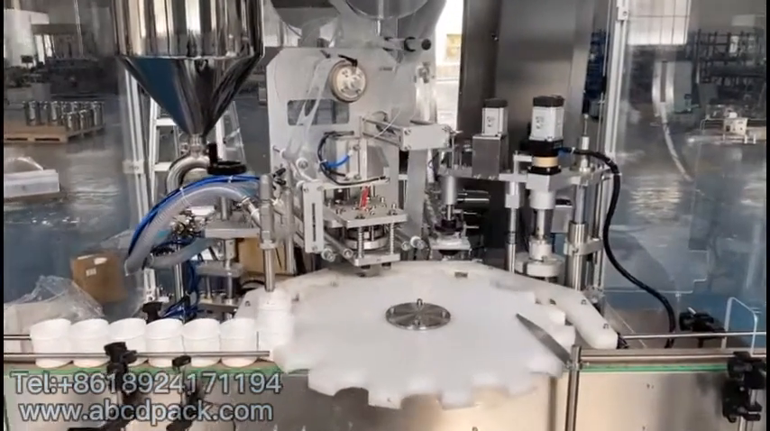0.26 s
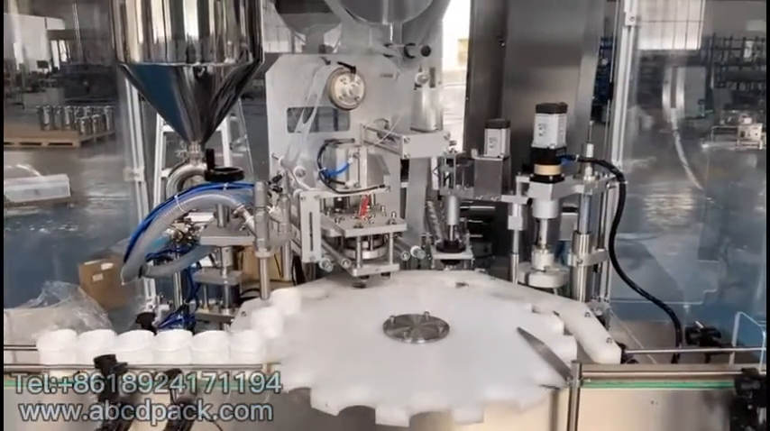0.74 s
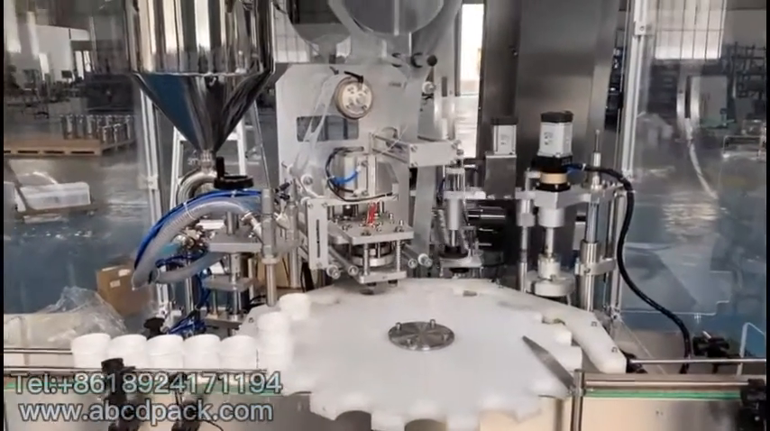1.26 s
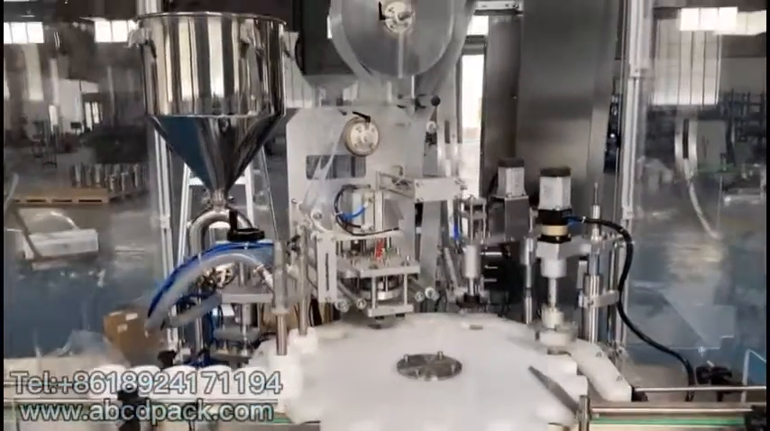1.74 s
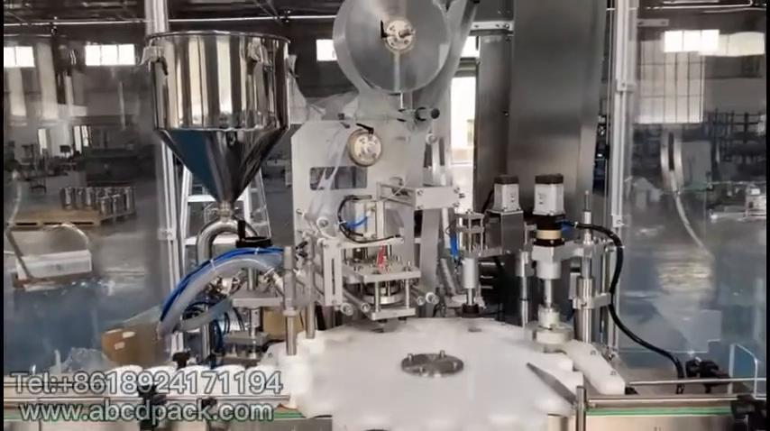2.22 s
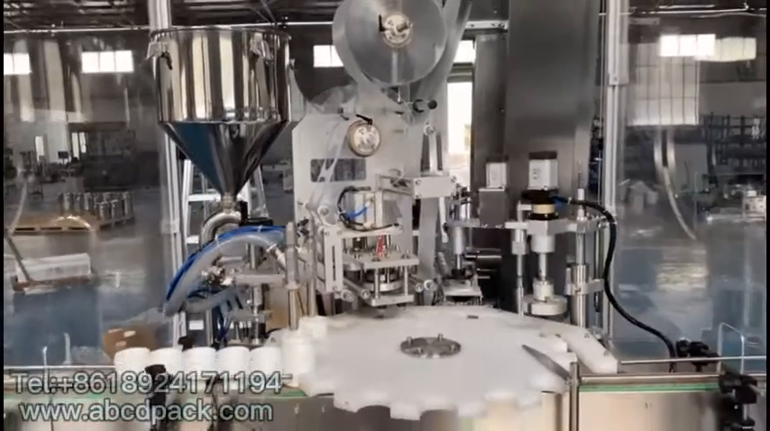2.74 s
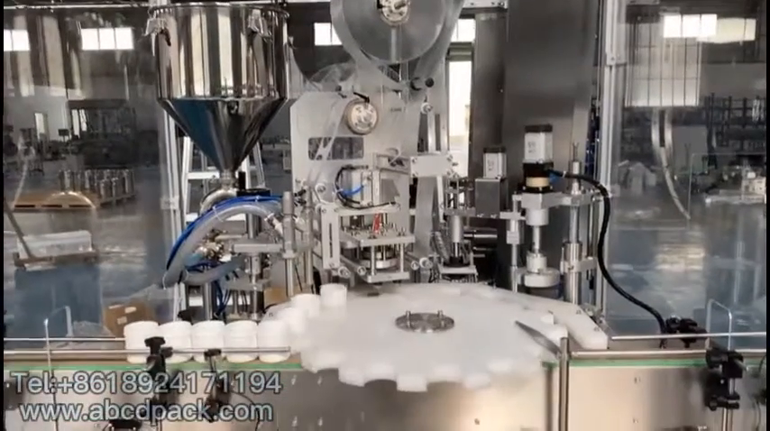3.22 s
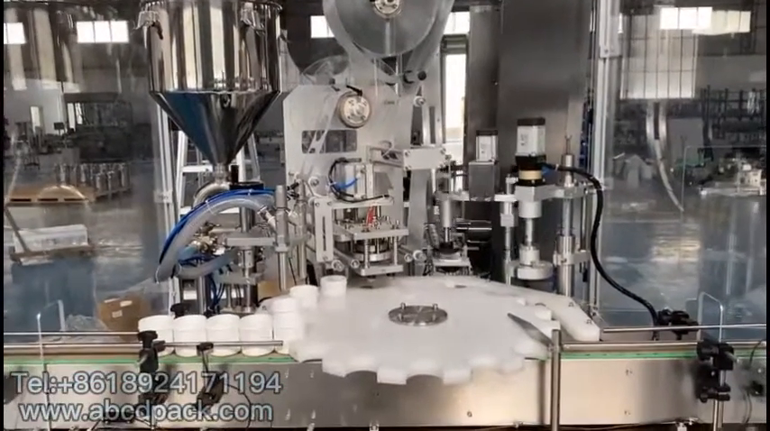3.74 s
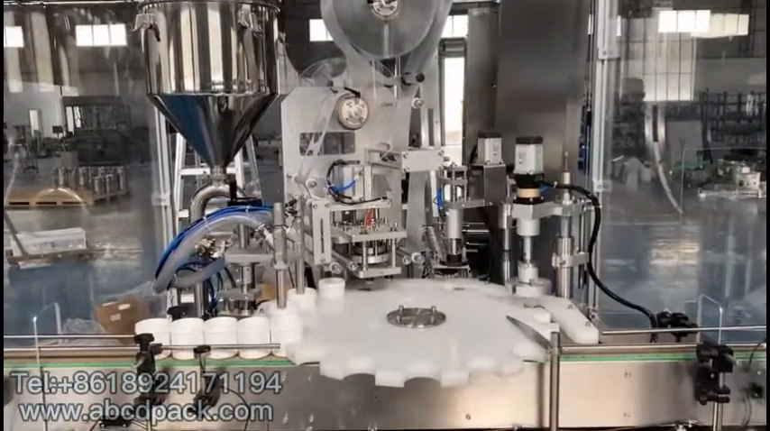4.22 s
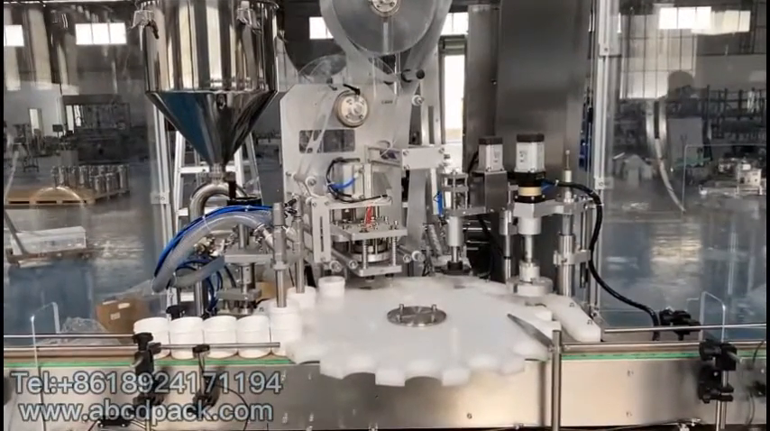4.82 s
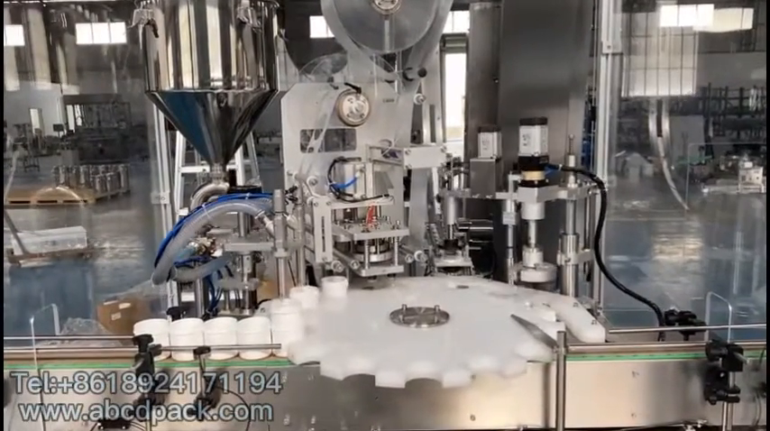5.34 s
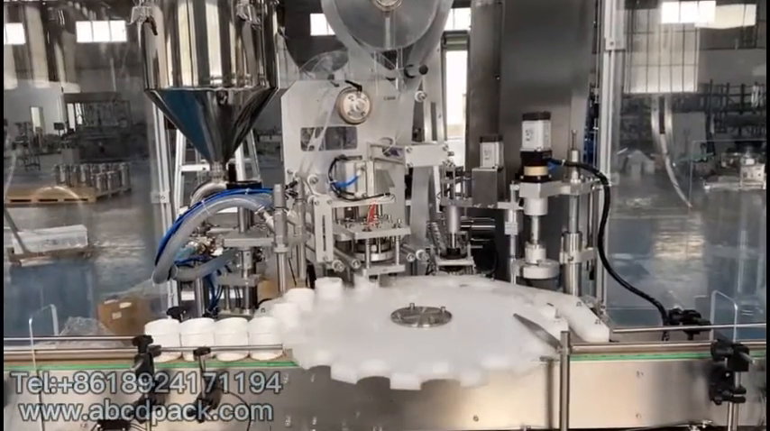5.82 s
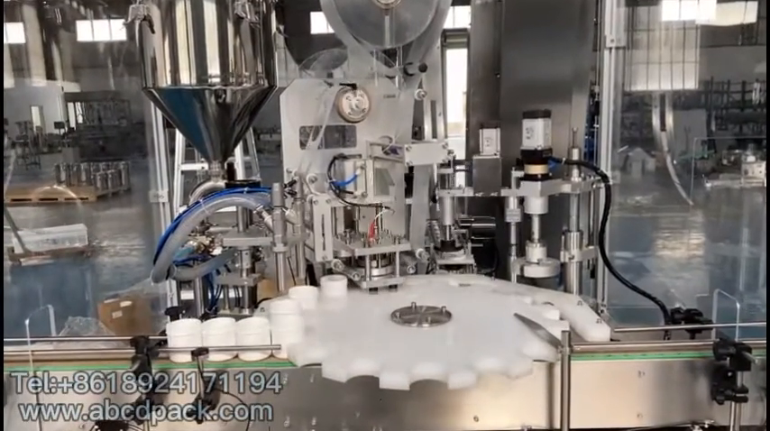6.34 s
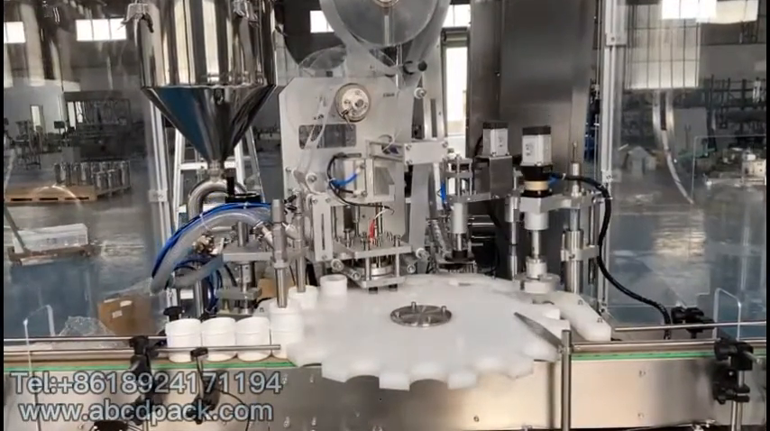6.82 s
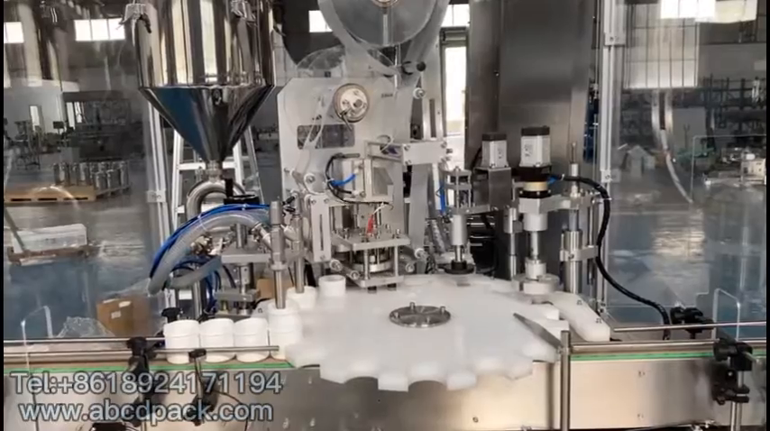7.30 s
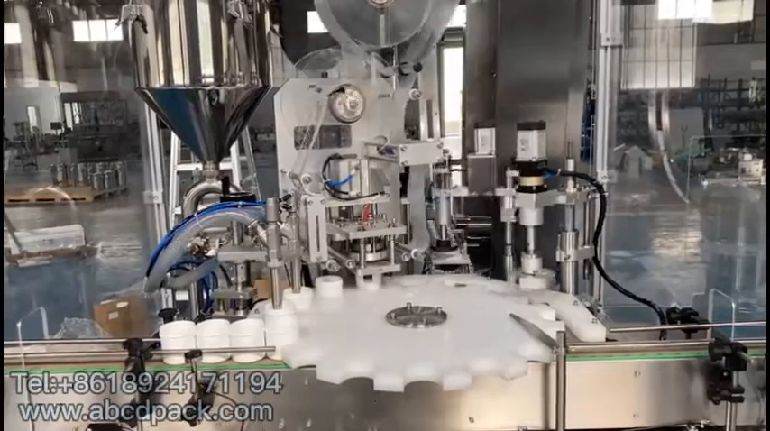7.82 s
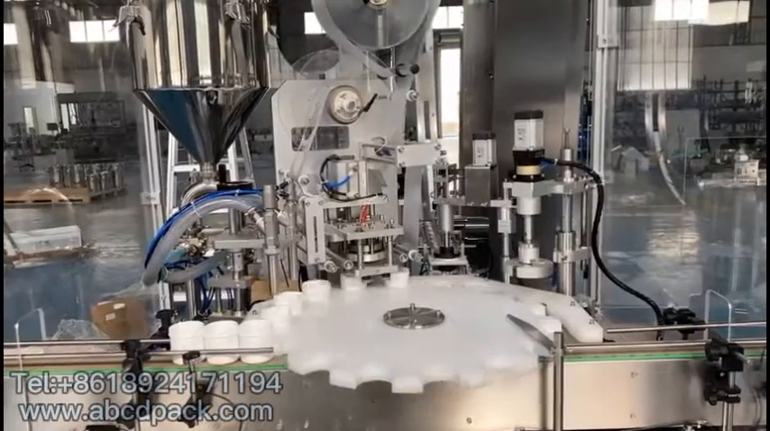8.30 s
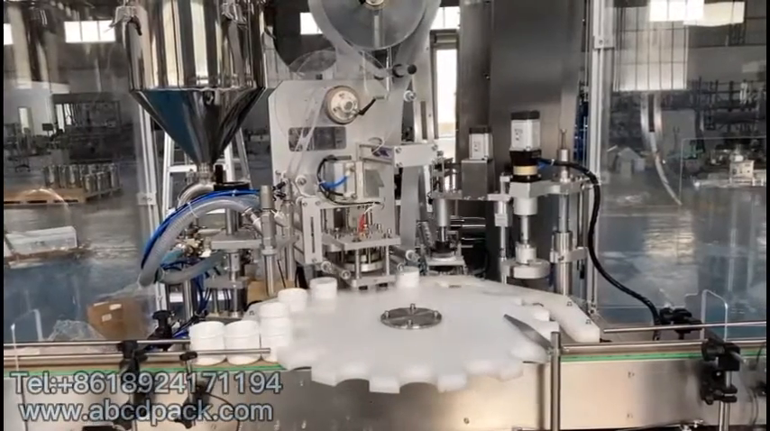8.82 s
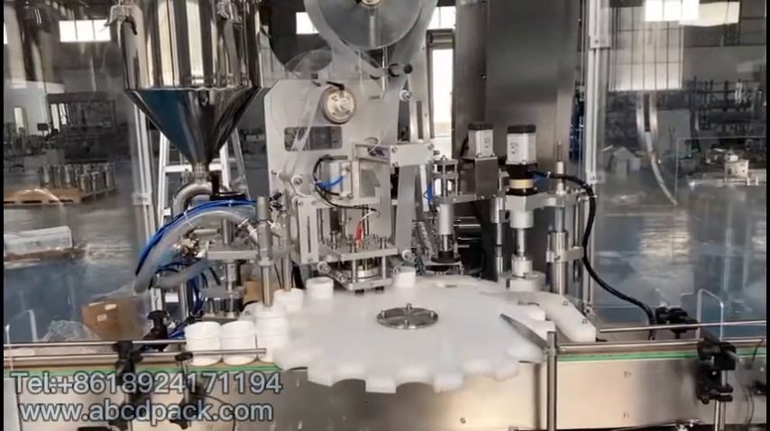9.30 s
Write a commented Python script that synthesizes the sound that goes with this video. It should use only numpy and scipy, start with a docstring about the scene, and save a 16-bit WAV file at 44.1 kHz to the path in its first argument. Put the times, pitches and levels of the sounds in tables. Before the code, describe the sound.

Close by, an automatic filler repeats every two and a half seconds, with hissing pneumatics, ringing metal stops, plastic clatter and humming motors.

```python
"""In a factory hall, a metre or two from a phone, a rotary bottle filler and capper runs four cycles.
Valves puff and vent shaped noise, cylinder stops ring the steel frame as decaying modes, caps clack.
Under it the conveyor judders in grains through its guide modes, the chain ticks in narrow noise bands,
and the drives whirr and hum. Table levels are relative: the functions that play them trim each layer."""
import sys
import numpy as np
from scipy import signal
from scipy.fft import rfft, irfft, next_fast_len
from scipy.io import wavfile

SR = 44100
rng = np.random.default_rng(int(sys.argv[2]) if len(sys.argv) > 2 else 0)


def waveform_to_disk(signal):
    """Save audio, clipped to [-1, 1], as 16-bit WAV at the path in sys.argv[1]."""
    frames = np.transpose(np.atleast_2d(signal))
    scaled = np.clip(frames, -1, 1) * 32767
    samples = np.round(scaled).astype(np.int16)
    wavfile.write(sys.argv[1], SR, samples)


N = 421596
T = np.arange(N) / SR
SIZE = next_fast_len(N + SR)
FREQS = np.maximum(np.arange(SIZE // 2 + 1) * SR / SIZE, 1)
EARS = np.array([[1], [-1]])  # left, right


def undb(db):
    """Decibels to gain."""
    return 10 ** (np.asarray(db) / 20)


def noise():
    """White noise of unit power."""
    return rng.standard_normal(N)


def through(x, response):
    """Filter with a response scaled to keep the power of white noise."""
    return irfft(rfft(x, SIZE) * response / np.sqrt(np.mean(abs(response) ** 2)), SIZE)[..., :N]


def colour(points, size=16384):
    """Causal response through (Hz, dB) points, falling away beyond the ends."""
    hz, db = np.transpose(points)
    f = np.maximum(np.arange(size // 2 + 1) * SR / size, 1)
    octaves_outside = np.maximum(np.log2(f / hz[-1]), 0) + np.maximum(np.log2(hz[0] / f), 0)
    curve_db = np.interp(np.log(f), np.log(hz), db) - 20 * octaves_outside
    # folding the cepstrum gives minimum phase, so nothing sounds early
    cepstrum = irfft(np.log(undb(curve_db)), size)
    impulse = irfft(np.exp(rfft(2 * cepstrum[:size // 2], size)), size)
    return rfft(impulse, SIZE)


def body(modes):
    """Summed response of (Hz, width Hz, dB) resonances."""
    return sum(undb(db) / (1 + 1j * (FREQS ** 2 - hz ** 2) / (FREQS * width)) for hz, width, db in modes)


def burst(start, decay, rise=0.0022, hold=0):
    """Envelope that rises, holds and dies away (all in seconds)."""
    env, first = np.zeros(N), max(int(start * SR), 0)
    t = T[:min(SR, N - first)]
    env[first:first + len(t)] = (1 - np.exp(-t / rise)) * np.exp(-np.maximum(t - hold, 0) / abs(decay))
    return env


def swell(middle, half):
    """Smooth bell-shaped envelope."""
    return np.exp(-np.minimum(((T - middle) / half) ** 2, 20))


def walk(rate):
    """Random wander: straight glides between random levels, rate knots per second."""
    knots = rng.standard_normal(N // 10)
    return np.interp(T * rate, np.arange(len(knots)), knots)


def grains(rate, spread_db):
    """Tiny random impacts of uneven size, about rate per second, unit power."""
    x, chance = np.zeros(N), rng.random(N)
    hits = chance < rate / SR
    sign, size = rng.standard_normal((2, N // 4))[:, :hits.sum()]
    x[hits] = np.sign(sign) * undb(spread_db * size)
    return x / np.std(x)


def ring(start, modes, rise, hold):
    """Modes driven for a moment, then dying away faster the wider they are; every blow differs a little."""
    out, t = np.zeros(N + SR), T[:SR // 3]
    for (hz, width, db), (phase, detune) in zip(modes, rng.random((len(modes), 2))):
        env = (1 - np.exp(-t / rise)) * np.exp(-np.pi * width * np.maximum(t - hold, 0))
        wave = np.sin(2 * np.pi * ((hz + (detune - .5) * width / 2) * t + phase))
        out[max(int(start * SR), 0):][:len(t)] += undb(db) * env * wave
    return out[:N]


def place(x, pan_db, wet):
    """Direct sound plus scatter from nearby steel; the bass reaches both microphones alike."""
    t = T[:SR // 2]
    tails = rng.standard_normal((2, len(t))) * undb(-60 * t / .18) * (t > .002)
    mid, side = rfft(tails / np.sqrt(np.sum(tails ** 2, axis=1, keepdims=True)), SIZE)
    apart = FREQS ** 2 / (FREQS ** 2 + 520 ** 2)
    response = undb(EARS * pan_db * apart / 2) + wet * apart * (0.5 * mid + EARS * side)
    return irfft(rfft(x, SIZE) * response, SIZE)[:, :N]


# a cycle begins: the index valve switches, then its cylinder hits the stop: valve_s, stop_s, stop_db
INDEXINGS = [(0.819, 0.957, -17.5), (3.415, 3.544, -19), (6.007, 6.145, -19), (8.594, 8.728, -21)]
# the bottle gate switches: start_s, puff_db, latch_db
GATES = [(.419, -25.5, -19.5), (3.001, -29, -20.5), (5.607, -30.5, -31), (8.195, -30.5, -28.5)]
# the belt catches on a guide and judders: start_s, hold_s, level_db
CATCHES = [(0.422, 0.017, -19), (0.467, 0.029, -25), (0.52, 0.014, -23.5), (0.549, 0.038, -27),
           (0.825, 0.01, -19), (0.894, 0.02, -22), (1.052, 0.0075, -21.5), (1.224, .012, -25),
           (1.274, .012, -31), (1.823, 0.0067, -26), (2.378, .008, -28), (2.988, 0.0067, -32),
           (3.011, 0.017, -24), (3.073, 0.011, -28), (3.384, .006, -19.5), (3.403, 0.0053, -18.5),
           (3.426, 0.011, -16.5), (3.48, 0.029, -19), (4.378, 0.019, -22.5), (4.55, 0.0055, -24),
           (4.603, .009, -21), (5.612, 0.0096, -17.5), (5.673, 0.024, -23.5), (6.012, 0.012, -18),
           (6.061, 0.014, -24), (6.601, 0.015, -23.5), (6.82, 0.0074, -23.5), (6.927, 0.0097, -29),
           (8.221, 0.014, -26), (8.57, 0.018, -18.5), (8.605, 0.009, -22), (8.697, .014, -32)]
# guide modes under the drag: pitch_hz, width_hz, level_db
GUIDE_MODES = [(751, 51, 8), (810, 110, 10.5), (930.6, 65, 14.5), (897, 17, -4)]
# guide modes that a catch rings: pitch_hz, width_hz, level_db
CATCH_MODES = [(945, 46, -5), (879, 69, -6.5), (771, 56, -7)]
# the belt slackens before each indexing and gate
SLACK_LEAD_S, REST_SLACK_DB, GATE_SLACK_DB, DRAG_DB = 0.12, 7.5, 5.5, -33.5
# it sticks and slips at an uneven rate; each slip fades within a share of its cycle
SLIP_HZ, SLIP_FADE, SLIP_DEPTH = 18, .5, .22


def conveyor():
    """The belt drags in tiny slips that ring its guides; it slackens and takes up again with a judder."""
    slack = sum(REST_SLACK_DB * swell(s - SLACK_LEAD_S, half=0.11) for s, _, _ in INDEXINGS)
    slack = slack + sum(GATE_SLACK_DB * swell(s - .04, half=0.04) for s, _, _ in GATES)
    cycle = np.cumsum(SLIP_HZ * np.exp(.25 * walk(20))) / SR % 1
    judder = 1 - SLIP_DEPTH + SLIP_DEPTH * np.exp(-cycle / SLIP_FADE) / SLIP_FADE
    drag = undb(DRAG_DB - slack + 1.6 * walk(30)) * judder
    slips = sum(undb(db - 11) * burst(s, decay=0.0089, hold=hold) for s, hold, db in CATCHES)
    restarts = [s for s, _, _ in INDEXINGS + GATES]
    strain = undb(-44.5) * sum(burst(s, decay=0.29, rise=0.013) for s in restarts)
    friction = drag + slips + strain
    guide = body(GUIDE_MODES) * body([(830, 194, 0)])
    # the long guides radiate from many places, so the two microphones hear partly different slips
    mid, side = (through(friction * grains(rate=1200, spread_db=2), guide) for _ in range(2))
    catches = sum(undb(db - 0.1) * ring(s, CATCH_MODES, rise=0.00088, hold=hold) for s, hold, db in CATCHES)
    return (mid + catches) * undb(EARS * 2.95) + undb(-3) * EARS * side


# bottle modes: pitch_hz, width_hz, level_db
BOTTLE_MODES = [(1760, 79, 3.5), (2300, 180, -4.5), (2880, 290, -4.5), (4720, 260, -1.5)]
JOSTLE_DB = -56
REST_LEAD_S, REST_HALF_S = 0.13, 0.057  # the drives rest just before each indexing


def bottles():
    """Plastic bottles rub and tap in uneven grains through their modes, fainter while the drives rest."""
    resting = sum(swell(s - REST_LEAD_S, half=0.045) for s, _, _ in INDEXINGS)
    taps = grains(rate=260, spread_db=3) * undb(3.5 * walk(22) - 12 * resting)
    jostle = through(taps, body(BOTTLE_MODES) * body([(2600, 3500, 0)]))
    return place(undb(JOSTLE_DB) * jostle, pan_db=11.0, wet=0.74)


# hall rumble spectrum: pitch_hz, density_db_per_hz
HALL_SPECTRUM = [(20, -47), (40, -9), (62, 4), (100, -10), (142, -6.5), (190, -9.5), (330, -6.5),
                 (500, -8.5), (800, -12.5), (1300, -19), (3000, -23), (5000, -34), (11000, -37)]
# drive whirr spectrum: pitch_hz, density_db_per_hz
WHIRR_SPECTRUM = [(100, 5.5), (400, 12), (1000, -9), (1400, 2), (2000, 5), (2500, 3), (3300, 6.5),
                  (4700, 4.5), (5400, 0), (6500, 1.5), (8000, -10.5), (11000, -36)]


def drives():
    """Noise rumbles in the hall and dense grains whirr; the drives rest once a cycle, restarting with a squeak."""
    rests = [s - REST_LEAD_S for s, _, _ in INDEXINGS]
    resting = sum(swell(s, REST_HALF_S) for s in rests)
    hall = through(noise(), colour(HALL_SPECTRUM)) * undb(-36.0 + 1.8 * walk(11) - 2 * resting)
    whirr = through(grains(rate=5000, spread_db=4.0), colour(WHIRR_SPECTRUM))
    whirr = whirr * undb(-47.0 + 2.0 * walk(13) - 7.5 * resting)
    squeak = sum(burst(s + 0.072, decay=0.018, hold=0.027) for s in rests) * undb(-39 + 2.2 * walk(150))
    squeak = through(squeak * noise(), body([(3380, 280, 0)]) * body([(3280, 1200, 0)]))
    return place(hall + whirr + squeak, pan_db=2.0, wet=0.74)


# wavering motor lines: pitch_hz, level_db
HUM_LINES = [(141, -48.5), (323, -54), (544, -51.5), (630, -48.5)]


def motors():
    """The motors hum in sine lines that each waver, swell and fade by themselves."""
    hum = 0
    for hz, db in HUM_LINES:
        line = np.sin(2 * np.pi * hz * T + 0.96 * walk(7))
        hum = hum + undb(db) * line * (1 + 0.39 * walk(9))
    return place(hum, pan_db=-6.0, wet=0.2)


# the big press cylinder dumps its air, then lands: dump_s, landing_s, blow_db
PRESSINGS = [(-.14, 0.005, -13.5), (2.456, 2.602, -15.5), (5.06, 5.194, -15), (7.563, 7.766, -15.5)]
# the capper slides down and lands: landing_s, blow_db, valve_db
CAPPINGS = [(1.416, -26.5, -21.5), (4.019, -25.5, -20.5), (6.52, -30, -23.5), (9.121, -26.5, -21.5)]
# the cap feeder's slide reaches an end stop: stop_s, blow_db
FEEDS = [(7.451, -25.5), (7.521, -20.5)]
# steel frame modes: pitch_hz, width_hz, level_db
FRAME_MODES = [(143.7, 9.7, -1), (173.2, 9.3, 2), (218.7, 13.6, -1.5), (299.3, 24, -0.5), (404, 62, -2),
               (476.6, 15, 3), (648, 10.7, -1), (700, 18, 2), (832, 62, -6), (888, 58, 0), (1070, 96, 0),
               (1213, 32, -3), (1400, 150, -11), (1528, 69, -15), (1662, 53, -10), (2100, 82, -22)]
# knock spectrum: pitch_hz, density_db_per_hz
KNOCK_SPECTRUM = [(60, 0.5), (200, 5.5), (900, 7), (1500, -4), (3000, -11), (7000, -22.5), (11000, -30)]
# low modes swing up later; press and capper landings push in faster than index and feeder stops
STOP_RISE_S, LANDING_RISE_S, STOP_HOLD_S, BASS_LAG_S = 0.0026, 0.0014, 0.018, 0.0052
PRESS_BASS_DB = -0.14  # per octave below 700 Hz
REBOUND_S, REBOUND_DB = .062, -16.5
CHATTER_DB, CHATTER_S = -23, 0.071  # loose joints chatter on after a stop


def cylinders():
    """Stops ring the frame, low modes latest, under a rattle of contacts; each slide rebounds once, softly."""
    stops = [(s, db, STOP_RISE_S, 0) for _, s, db in INDEXINGS] + [(s, db, STOP_RISE_S, 0) for s, db in FEEDS]
    stops += [(s, db, LANDING_RISE_S, PRESS_BASS_DB) for _, s, db in PRESSINGS]
    stops += [(s, db, LANDING_RISE_S, 0) for s, db, _ in CAPPINGS]
    frame = 0
    for s, db, rise, bass_db in stops:
        for (hz, width, mode_db), luck_db in zip(FRAME_MODES, rng.standard_normal(len(FRAME_MODES))):
            lag = BASS_LAG_S * FRAME_MODES[0][0] / hz
            level = undb(db - 10 + luck_db + bass_db * np.log2(700 / hz))
            frame = frame + level * ring(s + lag, [(hz, width, mode_db)], rise=rise + lag, hold=STOP_HOLD_S)
        rebound = ring(s + REBOUND_S, FRAME_MODES, rise=0.0078, hold=0.0038)
        frame = frame + undb(db - 4.0 + REBOUND_DB) * rebound
    blows = sum(undb(db) * burst(s, decay=0.021, rise=rise / 2, hold=0.023) for s, db, rise, _ in stops)
    knock = undb(-5) * through(blows * grains(rate=3300, spread_db=1.0), colour(KNOCK_SPECTRUM))
    shaken = sum(undb(db + CHATTER_DB) * burst(s + 0.028, decay=CHATTER_S, rise=0.014, hold=0.02)
                 for s, db, _, _ in stops)
    joints = through(shaken * grains(rate=130, spread_db=3), body(FRAME_MODES))
    return place(frame + knock + joints, pan_db=2.5, wet=0.47)


# chain links in turn: snap_db, roller_db
LINKS = [(-31, -35), (-30, -36), (-31.5, -35), (-30, -40), (-31, -42), (-31, -39), (-29.5, -46), (-30, -40),
         (-30, -37), (-26.5, -36.5), (-27.5, -31), (-28, -34), (-38, -44), (-25, -47), (-31, -44),
         (-28.5, -42), (-29, -42), (-25, -36), (-29, -38), (-27, -41), (-35, -38), (-32, -43), (-29, -42),
         (-27, -37), (-28, -40), (-31, -33), (-29, -37), (-26.5, -48), (-44, -40), (-28, -43), (-33, -36),
         (-34, -37), (-24, -40), (-26.5, -34), (-37, -32), (-30.5, -39), (-35, -30), (-26.5, -42),
         (-31, -40), (-30.5, -38)]
FIRST_LINK_S, LINK_PERIOD_S, LINK_RISE_S = .109, .2359, .003
LINK_HZ, ROLLER_HZ, LINK_SCATTER_HZ = 3810, 2510, 28


def chain():
    """Links snap evenly onto the sprocket, each roller settling lower, no two quite at one pitch."""
    def band(x, lo, hi, order):
        return signal.sosfilt(signal.butter(order, [lo, hi], "band", fs=SR, output="sos"), x)

    out, t = np.zeros(N + SR), T[:SR // 10]
    snap = (1 - np.exp(-(t / LINK_RISE_S) ** 2)) * (np.exp(-t / 0.0052) + 0.32 * np.exp(-t / 0.016))
    settle = (1 - np.exp(-(t / 0.0069) ** 2)) * np.exp(-t / 0.017)
    for k, (snap_db, roller_db) in enumerate(LINKS):
        hz, low = np.array([LINK_HZ, ROLLER_HZ]) + LINK_SCATTER_HZ * rng.standard_normal(2)
        hiss, rattle = rng.standard_normal((2, len(t)))
        link = band(band(snap * hiss, hz - 150, hz + 150, order=1), 2800, 4600, order=2)
        roller = band(settle * rattle, low - 110, low + 110, order=1)
        tick = undb(snap_db + 17.5) * link + undb(roller_db + 23.0) * roller
        out[int((FIRST_LINK_S + k * LINK_PERIOD_S) * SR):][:len(t)] += tick
    return place(out[:N], pan_db=5.0, wet=0.14)


def jet(envelope, treble_db, spectrum, flutter_db):
    """Turbulent air as fluttering coloured noise; treble_db lifts or cuts its top."""
    air = through(noise(), colour(spectrum)) * undb(flutter_db * walk(170))
    top = irfft(rfft(air, SIZE) / (1 + (7500 / FREQS) ** 6), SIZE)[:N]
    return envelope * (air + (undb(treble_db) - 1) * top)


# valve puff spectrum: pitch_hz, density_db_per_hz
PUFF_SPECTRUM = [(200, 15), (1000, 3.5), (2000, 6), (3400, 6.5), (5000, 2), (6800, -1.5), (8000, -6.5),
                 (11000, -5)]
INDEX_PUFF_DB, SHUT_PUFF_DB = -21.5, -25
DUMP_S = 0.11  # how long the press dumps its air


def valves():
    """Index and gate valves puff brightly, then faintly again; the capper puffs once, the press more dully."""
    switches = [(s, INDEX_PUFF_DB) for s, _, _ in INDEXINGS] + [(s, db) for s, db, _ in GATES]
    bright = sum(undb(db - 3.0) * (burst(s, decay=0.035) + undb(-11.5) * burst(s + 0.063, decay=0.025))
                 for s, db in switches)
    capper = sum(undb(db - 1.0) * burst(s, decay=0.015) for s, _, db in CAPPINGS)
    shut = sum(burst(s + DUMP_S, decay=0.016) + undb(-16) * burst(landing, decay=0.025)
               for s, landing, _ in PRESSINGS if s > 0)
    puffs = jet(bright, 4.1, PUFF_SPECTRUM, flutter_db=1.5) + jet(capper, 2.2, PUFF_SPECTRUM, flutter_db=2.0)
    puffs = puffs + jet(undb(SHUT_PUFF_DB) * shut, -5, PUFF_SPECTRUM, flutter_db=5.0)
    return place(puffs, pan_db=4.0, wet=0.69)


# air turns the star wheel one pocket on: start_s, rumble_db
TURNS = [(5.981, -21.5), (8.562, -21.5)]


def travels():
    """(envelope, dB) of each travel: the wheel turns, the capper and feeder slide, the press draws back."""
    wheel = [(swell(s + 0.323, half=0.061), db) for s, db in TURNS]
    capper = [(swell(s + 0.018, half=0.18), -30.5) for s, _, _ in CAPPINGS]
    feeder = [(swell(s, half=0.045), -34) for s, _ in FEEDS]
    press = [(swell(s + 0.2, half=0.09), -29) for dump, s, _ in PRESSINGS if dump > 0]
    return wheel + capper + feeder + press


# hard caps clack in the gripper: start_s, level_db, loudest_hz
CLACKS = [(0.957, -37, 2000), (1.027, -25, 1280), (1.418, -27, 1900), (3.613, -25.5, 1200),
          (4.019, -29, 1500), (5.2, -17.5, 1400), (6.2216, -23, 1150), (6.305, -26, 1350),
          (6.538, -26.5, 1700), (7.152, -13.5, 1140), (7.19, -15, 2300), (7.246, -9.5, 1600),
          (7.773, -16, 1400), (8.805, -23, 1150), (8.882, -19.5, 1400)]
# cap and gripper modes: pitch_hz, width_hz, level_db
CAP_MODES = [(995, 86, -1.5), (1274, 97, -9), (1403, 70, -3.5), (1700, 140, -19), (2048, 130, -4),
             (2495, 85, -12), (2920, 81, -11)]
# clack spectrum: pitch_hz, density_db_per_hz
CLACK_SPECTRUM = [(400, -13), (1000, -0.5), (1370, 8), (1700, -25), (2100, -6), (3000, -20), (8000, -16)]
# gate latch modes: pitch_hz, width_hz, level_db
LATCH_MODES = [(2500, 63, -4), (3190, 59, -2), (3480, 43, 1.5), (3900, 40, -15)]
CAP_RISE_S, CAP_HOLD_S = .0004, .008
CAP_FOCUS_DB = 14  # drop per octave away from the loudest pitch
INDEX_LATCH_DB, CAPPER_LATCH_DB, GATE_RING_DB, CAPPER_RATTLE_DB = -22, -22.5, -10.5, -36


def fittings():
    """Caps clack in the gripper, latches snap as valves switch, loose parts rattle while the slides travel."""
    def struck(centre):
        return [(hz, width, db - CAP_FOCUS_DB * abs(np.log2(hz / centre))) for hz, width, db in CAP_MODES]

    caps = sum(undb(db - 4.0) * ring(s, struck(centre), rise=CAP_RISE_S, hold=CAP_HOLD_S)
               for s, db, centre in CLACKS)
    cracks = sum(undb(db - 11.5) * burst(s, decay=0.0096, rise=0.0011, hold=0.0095) for s, db, _ in CLACKS)
    cracks = through(cracks * grains(rate=5000, spread_db=1.5), colour(CLACK_SPECTRUM))
    snaps = [(s, INDEX_LATCH_DB) for s, _, _ in INDEXINGS] + [(s, CAPPER_LATCH_DB) for s, _, _ in CAPPINGS]
    snaps += [(s, db) for s, _, db in GATES]
    latches = sum(undb(db - 10.0) * burst(s, decay=0.011, rise=0.0014, hold=0.0093) for s, db in snaps)
    latches = through(latches * grains(rate=4000, spread_db=10.0), body([(3120, 1450, 0)]) ** 2)
    spring = sum(undb(db + GATE_RING_DB) * ring(s, LATCH_MODES, rise=.0015, hold=0.012) for s, _, db in GATES)
    jolts = undb(CAPPER_RATTLE_DB) * sum(burst(s, decay=0.021) for s, _, _ in CAPPINGS)
    loose = (undb(-46.5) * sum(env for env, _ in travels()) + jolts) * grains(rate=600, spread_db=3)
    loose_body = body([(1750, 59, 15.0), (2340, 610, 5.5), (3220, 490, -12)]) * body([(2400, 1900, 0)])
    return place(caps + cracks + latches + spring + through(loose, loose_body), pan_db=2.5, wet=0.86)


# slides vent through silencers: start_s, hold_s, level_db, lurch_db
VENTS = [(1.14, 0.063, -30, -34.5), (3.726, 0.082, -30.5, -31), (6.733, 0.027, -29, -39),
         (7.042, 0.084, -26.5, -36), (7.14, 0.27, -30.5, -33), (7.431, 0.03, -28, -44),
         (9.314, 0.038, -32, -45)]
# the cabinet also swings between strokes: start_s, hold_s, level_db
SWAYS = [(0.721, 0.074, -34.5), (2.75, .025, -38), (5.253, 0.027, -31), (8.937, 0.028, -27.5),
         (9.033, .05, -38)]
# cabinet panel modes: pitch_hz, width_hz, level_db
CABINET_MODES = [(62.2, 11.6, -0.5), (143.5, 7.2, -10.5), (219.5, 21, -13.5)]
# rolling slide spectrum: pitch_hz, density_db_per_hz
ROLL_SPECTRUM = [(30, -20), (68, 12), (105, -3), (145, 2), (200, 1), (330, 3), (500, -19), (900, 0),
                 (1400, -19), (3000, -22), (8000, -31)]
# moving masses rock the cabinet, some time after the stroke starts
INDEX_LURCH_DB, PRESS_LURCH_DB, PRESS_LURCH_S = -34.5, -24.5, 0.0212
TURN_LURCH_DB, TURN_LURCH_S = -27.5, .275


def cabinet():
    """Sudden strokes set the panels swinging; travelling slides make them rumble."""
    lurches = [(s, INDEX_LURCH_DB, .03) for s, _, _ in INDEXINGS]
    lurches += [(s + PRESS_LURCH_S, PRESS_LURCH_DB, .026) for s, _, _ in PRESSINGS if s > 0]
    lurches += [(s + TURN_LURCH_S, TURN_LURCH_DB, .058) for s, _ in TURNS]
    lurches += [(s + 0.0147, db, .024) for s, _, _, db in VENTS]
    lurches += [(s, db, hold) for s, hold, db in SWAYS]
    swing = sum(undb(db + 7.5) * ring(s, CABINET_MODES, rise=0.0024, hold=hold) for s, db, hold in lurches)
    travel = sum(undb(db - 5.0) * env for env, db in travels())
    return swing + place(through(travel * noise(), colour(ROLL_SPECTRUM)), pan_db=-2, wet=1.0)


# first-contact crack spectrum: pitch_hz, density_db_per_hz
CRACK_SPECTRUM = [(500, 0), (1000, -2), (1600, -4), (2600, -14), (3400, -27), (8000, -30)]
CRACK_DB, CRACK_RISE_S, CRACK_DECAY_S = -5, .0003, .006  # level against the blow


def contacts():
    """The first touch of an index stop, feeder stop or cap is a hard, short crack of noise."""
    hits = [(s, db + 3) for _, s, db in INDEXINGS] + FEEDS + [(s, db - 5) for s, db, _ in CLACKS]
    touch = sum(undb(db + CRACK_DB) * burst(s, decay=CRACK_DECAY_S, rise=CRACK_RISE_S) for s, db in hits)
    return place(through(touch * noise(), colour(CRACK_SPECTRUM)), pan_db=5, wet=.4)


# loose fittings shake as the press draws back and the feeder moves: start_s, hold_s, level_db
RATTLES = [(1.006, 0.039, -37), (2.775, .018, -30.5), (2.819, 0.021, -34.5), (5.378, .018, -30.5),
           (5.411, 0.028, -34), (5.455, .014, -42), (7.422, 0.011, -29), (7.83, 0.015, -26.5),
           (7.868, 0.041, -32), (8.75, 0.018, -39)]
# loose fitting modes: pitch_hz, width_hz, level_db
LOOSE_MODES = [(344, 130, 14), (620, 140, 11.5), (1320, 130, -5), (1790, 200, -3), (2320, 140, -0.5),
               (3150, 320, -21)]


def rattles():
    """Loose fittings chatter in short bouts of grains through their modes."""
    bouts = sum(undb(db) * burst(s, decay=0.017, rise=0.0022, hold=hold) for s, hold, db in RATTLES)
    chatter = through(bouts * grains(rate=990, spread_db=0), body(LOOSE_MODES) * body([(1300, 4100, 0)]))
    return place(chatter, pan_db=2, wet=0.61)


# vented air spectrum: pitch_hz, density_db_per_hz
VENT_SPECTRUM = [(300, -11), (1500, -0.5), (2500, 8.5), (4000, 8), (4700, 3), (5400, -1.5), (6200, 5),
                 (7000, 3), (7900, 0), (10000, 1), (11000, 0)]
TURN_S, TURN_AIR_DB, CAPPER_S, CAPPER_AIR_DB = 0.39, -32.5, 0.1, -34.5
TREBLE_DB = 5.5  # extra top treble of narrow air openings


def silencers():
    """Air vents as turbulent noise for as long as a slide or the wheel travels."""
    vents = [(s, hold, db) for s, hold, db, _ in VENTS] + [(s, TURN_S, TURN_AIR_DB) for s, _ in TURNS]
    vents += [(s - CAPPER_S, CAPPER_S, CAPPER_AIR_DB) for s, _, _ in CAPPINGS]
    flow = sum(undb(db - 6) * burst(s, decay=0.035, rise=0.007, hold=hold) for s, hold, db in vents)
    # each vent first sings in its hose, until the pressure settles
    gush = sum(undb(db - 6) * burst(s, decay=0.022, rise=0.031, hold=0.037) for s, _, db in vents)
    hose = through(gush * grains(rate=1800, spread_db=1), body([(4330, 1800, 0)]) ** 2)
    # the flow is uneven, and the sliding parts scrape in small grains
    flow = flow * undb(1.5 * walk(70))
    slide_body = body([(1780, 180, 3), (2550, 360, -1), (3940, 300, 1), (4650, 300, -2)])
    slide_body = slide_body * body([(2900, 3800, 0)])
    scrape = undb(-6.5) * through(flow * grains(rate=220, spread_db=4.0), slide_body)
    return place(jet(flow, TREBLE_DB, VENT_SPECTRUM, flutter_db=0.35) + hose + scrape, pan_db=1.0, wet=0.43)


# air sputters through a hose and sinks in pitch: start_s, hold_s, level_db, first_hz
GUSHES = [(1.165, 0.066, -33.5, 4450), (3.74, .05, -35, 4970), (6.3, 0.063, -35, 4470),
          (7.06, .05, -36, 4600), (8.64, .035, -39, 4200), (8.908, .05, -34, 4500)]
GUSH_SAG_HZ_PER_S = 8500


def gushes():
    """Turbulent air sputters in a narrow band that sinks: a gliding sine shaken by fast wander."""
    out = 0
    for s, hold, db, first_hz in GUSHES:
        hz = first_hz - GUSH_SAG_HZ_PER_S * np.clip(T - s, 0, hold)
        tone = np.sin(2 * np.pi * np.cumsum(hz) / SR)
        out = out + undb(db) * burst(s, decay=0.016, rise=0.008, hold=hold) * tone
    sputter = walk(800) * undb(3 * walk(110))
    return place(out * sputter, pan_db=4.0, wet=0.49)


SING_DB, SING_HZ, SING_SAG_HZ_PER_S, SING_S = -43, 4700, 9800, 0.079


def hoses():
    """While the capper or press moves its hose sings: a sinking sine made breathy by fast wander."""
    starts = [s - SING_S for s, _, _ in CAPPINGS] + [s + .035 for s, _, _ in PRESSINGS if s > 0]
    out = 0
    for s in starts:
        hz = SING_HZ - SING_SAG_HZ_PER_S * np.clip(T - s, 0, SING_S)
        out = out + burst(s, decay=0.013, rise=.012, hold=SING_S) * np.sin(2 * np.pi * np.cumsum(hz) / SR)
    return place(undb(SING_DB) * out * walk(350), pan_db=1.5, wet=0.38)


# capper chuck modes: pitch_hz, width_hz, level_db
CHUCK_MODES = [(1820, 76, -1), (2246, 50, -9), (2630, 70, -9), (3270, 70, -2), (3680, 90, -4),
               (4360, 110, 0.5)]
CHUCK_DB, CHUCK_GAP_S, CHUCK_STEP_DB = -33.5, .009, 1  # each touch a step louder


def chuck():
    """The chuck touches each cap three times in quick succession and rings briefly."""
    touches = [(s + k * CHUCK_GAP_S, CHUCK_DB + k * CHUCK_STEP_DB) for s, _, _ in CAPPINGS for k in range(3)]
    clatter = sum(undb(db) * ring(s, CHUCK_MODES, rise=.001, hold=0.0024) for s, db in touches)
    return place(clatter, pan_db=11, wet=0.7)


# the press port chirps as it opens and shuts: lag_s after the dump starts, level_db, pitch_hz
PORT_CHIRPS = [(0.02, -20, 6540), (.112, -19.5, 6140)]
# dumped air spectrum: pitch_hz, density_db_per_hz
DUMP_SPECTRUM = [(200, 8.5), (1300, 6.5), (3000, 3), (5000, 4.5), (6300, 1), (7100, -0.5), (7700, -6),
                 (9500, 2.5), (11000, 2)]
# exhaust pipe resonances: pitch_hz, width_hz, level_db
EXHAUST_MODES = [(5330, 33, -3), (5560, 19, -3), (6000, 33, -1), (6540, 30, -3), (7070, 55, -3)]
DUMP_DB, EXHAUST_DB = -31, -6.5


def press_air():
    """The press cylinder's dump rings its exhaust pipe, with a rough chirp as the port opens and shuts."""
    starts = [s for s, _, _ in PRESSINGS if s > 0]
    whistles = [(s + lag, db, hz) for s in starts for lag, db, hz in PORT_CHIRPS]
    flow = undb(DUMP_DB) * sum(burst(s, decay=0.028, rise=0.0086, hold=DUMP_S) for s in starts)
    surges = sum(undb(db - 11) * burst(s, decay=0.026) for s, db, _ in whistles)
    pipe = through(noise(), body(EXHAUST_MODES) * body([(6000, 3000, 0)]))
    air = through(noise(), colour(DUMP_SPECTRUM)) + undb(EXHAUST_DB) * pipe
    dump = (flow + surges) * air * undb(2.7 * walk(120))
    chirps, hiss = 0, noise()
    for s, db, hz in whistles:
        port = signal.butter(3, [hz - 400, hz + 400], "band", fs=SR, output="sos")
        surge = undb(db) * burst(s, decay=0.015, rise=0.00054, hold=0.0025) * hiss
        chirps = chirps + undb(10.5) * signal.sosfilt(port, surge + 1e-18)
    return place(dump + chirps, pan_db=2.0, wet=0.6)


def scene():
    """The machine and the long, dull answer of the hall."""
    machine = conveyor() + bottles() + cylinders() + chain() + valves() + fittings() + cabinet()
    machine = machine + contacts() + rattles() + silencers() + gushes() + hoses() + chuck() + press_air()
    tail = rng.standard_normal(SR) * undb(-60 * T[:SR] / 0.77) * (T[:SR] > .02)
    answer = rfft(tail / np.linalg.norm(tail), SIZE) / (1 + (FREQS / 5000) ** 2)
    echo = irfft(rfft(machine.mean(axis=0), SIZE) * answer, SIZE)[:N]
    return machine + drives() + motors() + undb(-11.5) * place(echo, pan_db=1, wet=.8)


# the phone's two microphones: pitch_hz, left_lead_rad
MIC_PHASE = [(100, 0), (300, .1), (600, .45), (950, .95), (1400, .4), (1800, -.5), (2500, 0), (3100, .4),
             (3600, 0), (7400, -.1), (7750, -2.2), (8300, -3), (8700, -3.3), (9050, -5.1), (10000, -6.28),
             (10800, -6.9), (11400, -9.3)]
# their stereo width: pitch_hz, width_db
MIC_WIDTH = [(130, 0), (300, 0), (550, 3), (850, -4.5), (1200, 0), (1750, 5.5), (2600, -4.5), (3250, 2),
             (3600, -1.5), (4200, -8), (5100, 3), (6600, -12.5), (7600, 8), (8300, -9.5), (10000, -26)]
TOP_HZ = 11000


def record(dry):
    """The phone's two microphones differ in phase, oppose each other in part of the treble, and cut the top."""
    def curve(points):
        hz, value = np.transpose(points)
        return np.interp(np.log(FREQS), np.log(hz), value)

    left, right = rfft(dry, SIZE)
    pair = (left + right) / 2 + EARS * undb(curve(MIC_WIDTH)) * (left - right) / 2
    sound = irfft(pair * np.exp(1j * EARS * curve(MIC_PHASE) / 2), SIZE)[:, :N]
    return signal.sosfilt(signal.ellip(10, .2, 80, TOP_HZ, fs=SR, output="sos"), sound)


dry = scene()
out = record(dry)
waveform_to_disk(out)
```